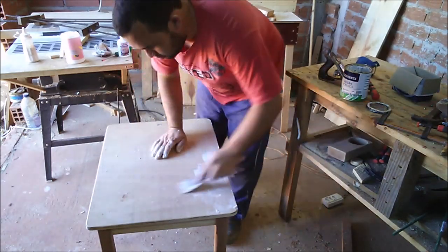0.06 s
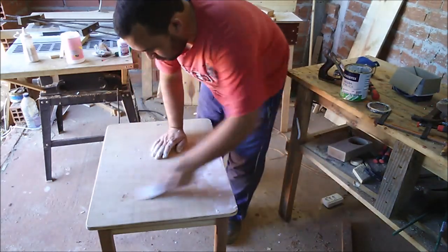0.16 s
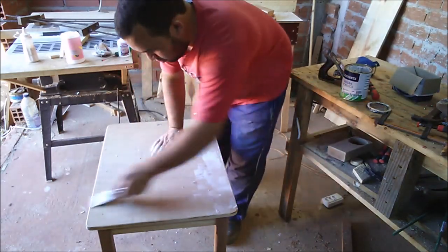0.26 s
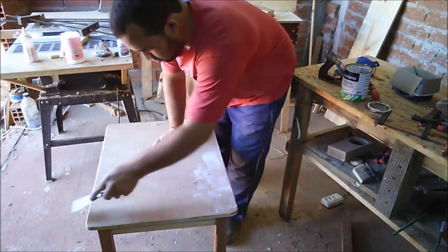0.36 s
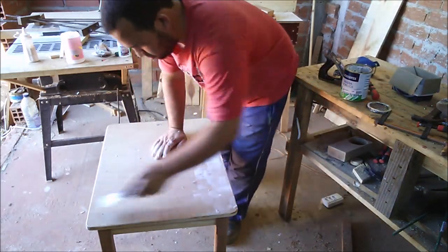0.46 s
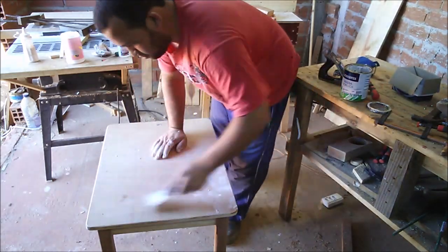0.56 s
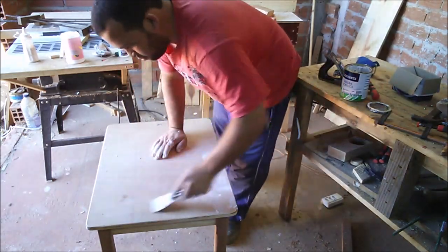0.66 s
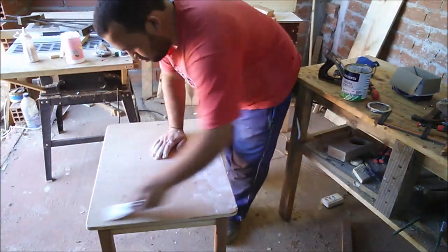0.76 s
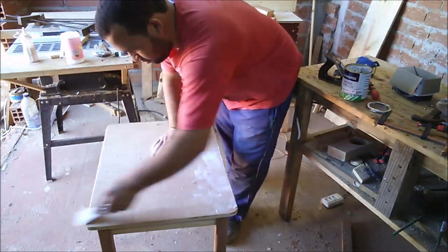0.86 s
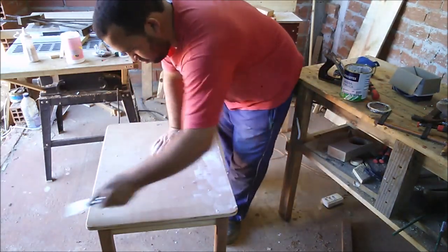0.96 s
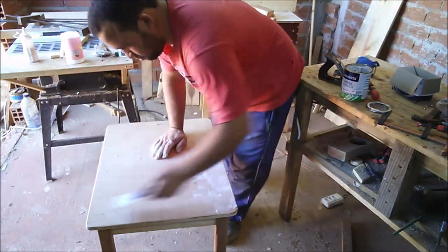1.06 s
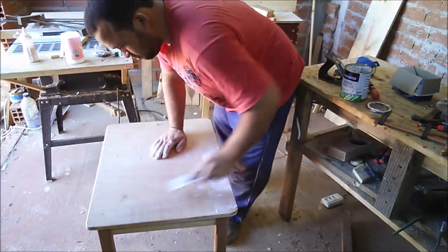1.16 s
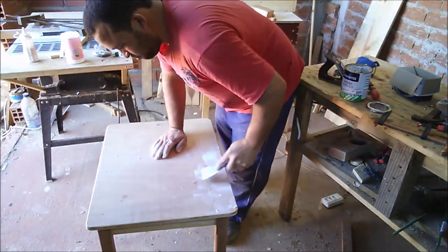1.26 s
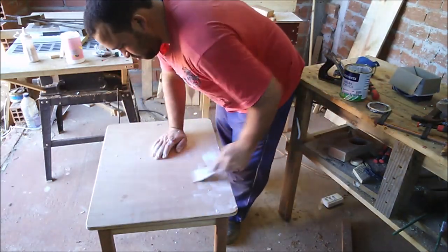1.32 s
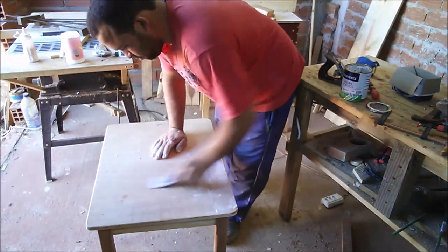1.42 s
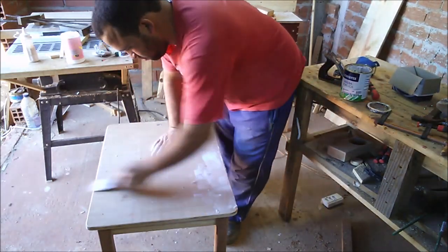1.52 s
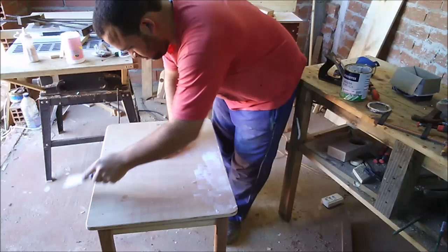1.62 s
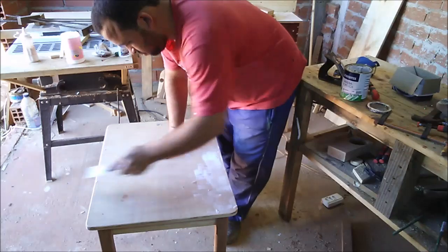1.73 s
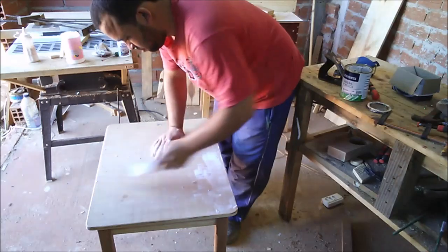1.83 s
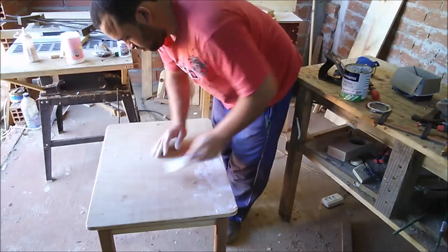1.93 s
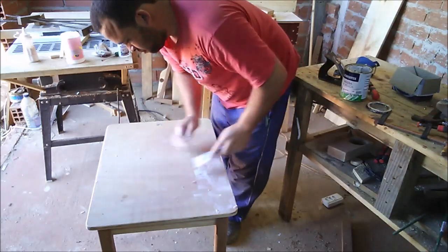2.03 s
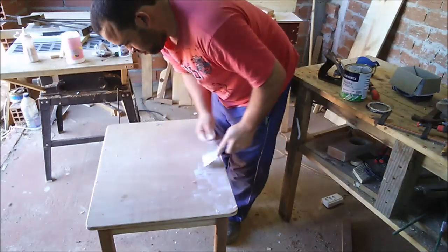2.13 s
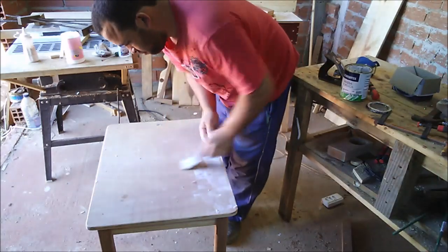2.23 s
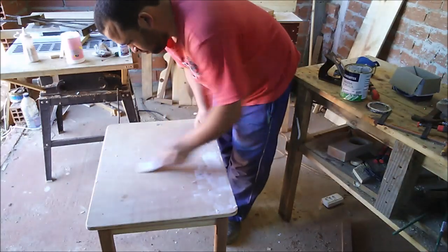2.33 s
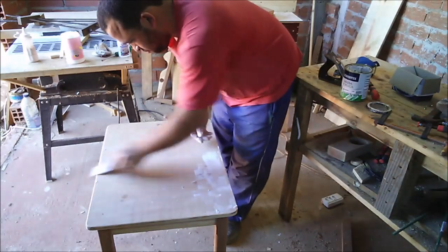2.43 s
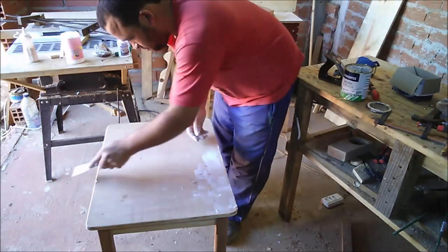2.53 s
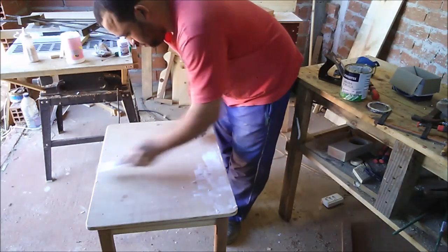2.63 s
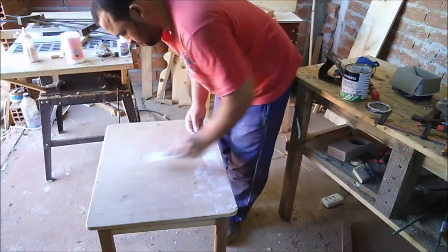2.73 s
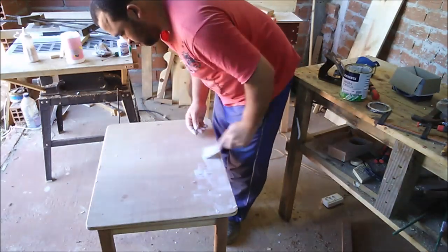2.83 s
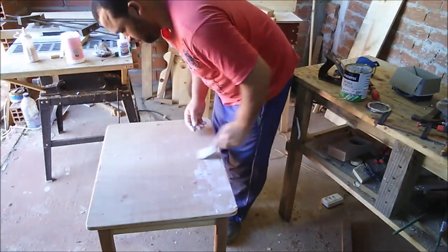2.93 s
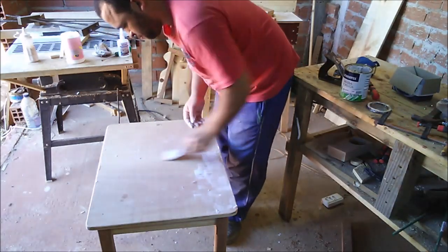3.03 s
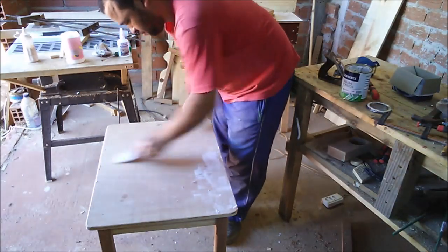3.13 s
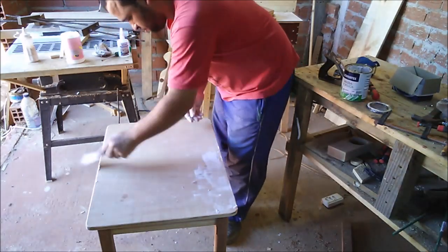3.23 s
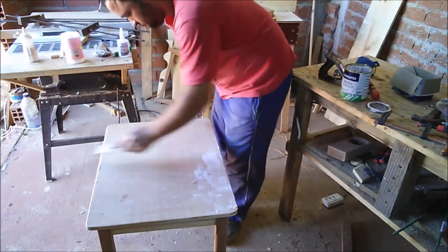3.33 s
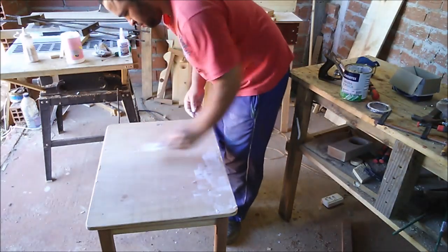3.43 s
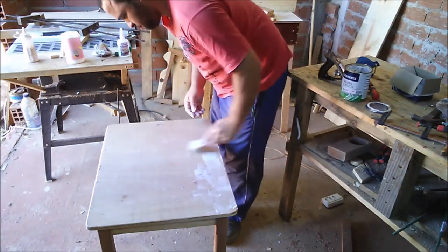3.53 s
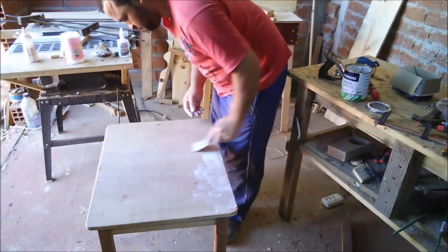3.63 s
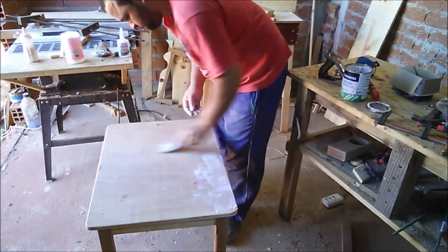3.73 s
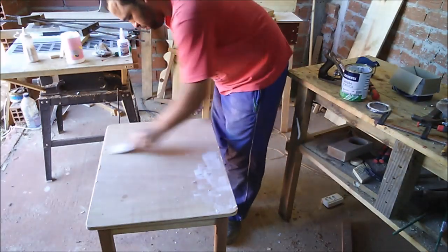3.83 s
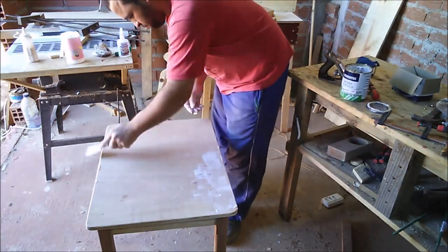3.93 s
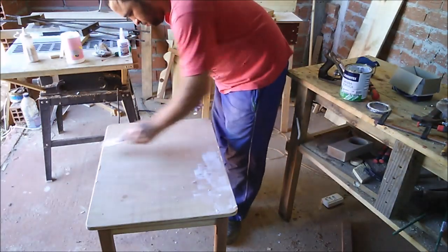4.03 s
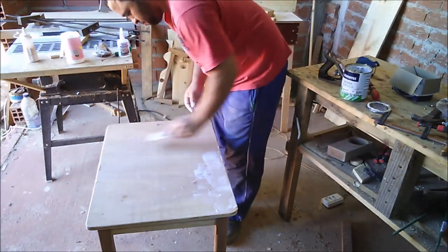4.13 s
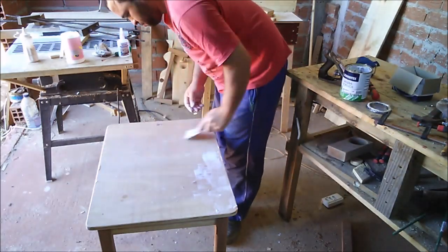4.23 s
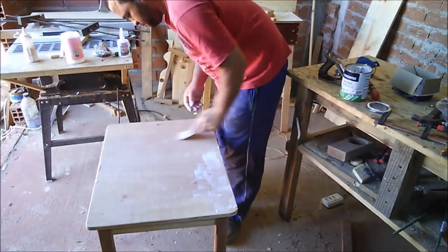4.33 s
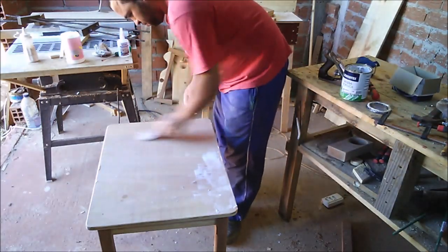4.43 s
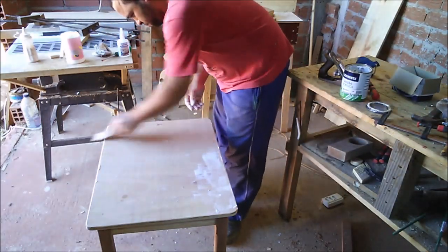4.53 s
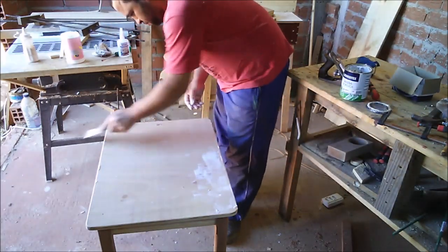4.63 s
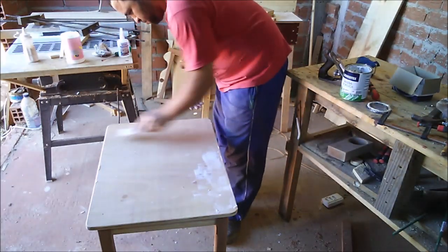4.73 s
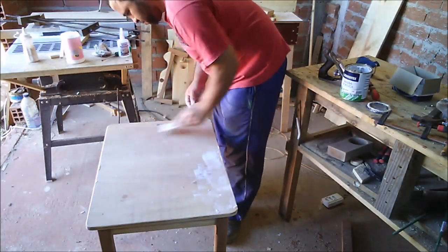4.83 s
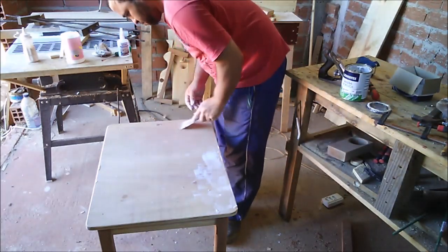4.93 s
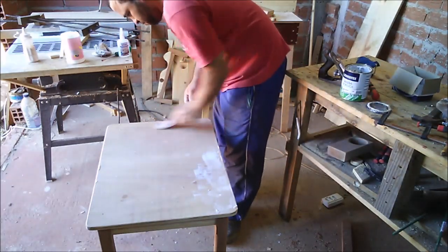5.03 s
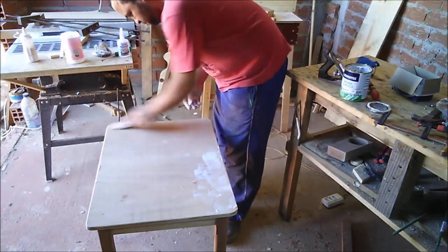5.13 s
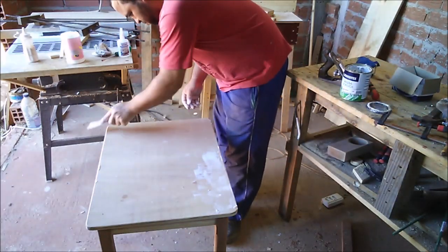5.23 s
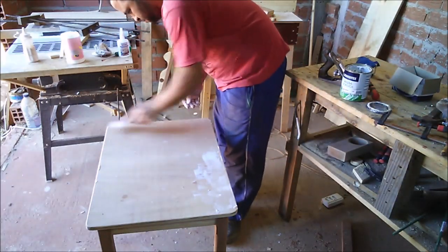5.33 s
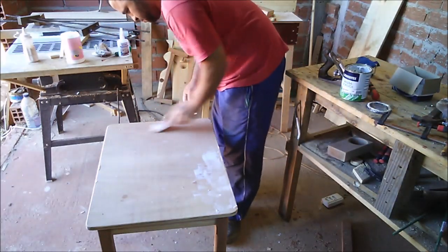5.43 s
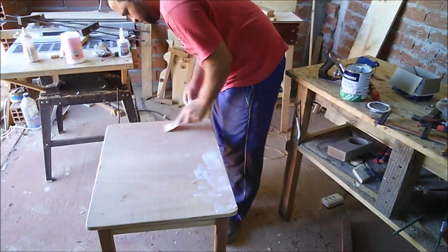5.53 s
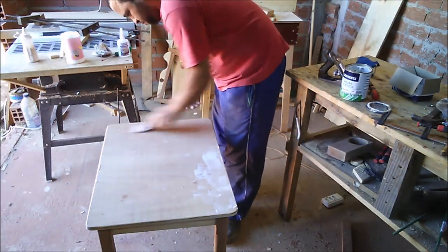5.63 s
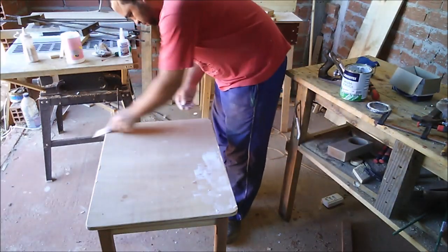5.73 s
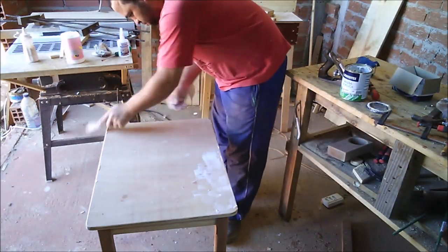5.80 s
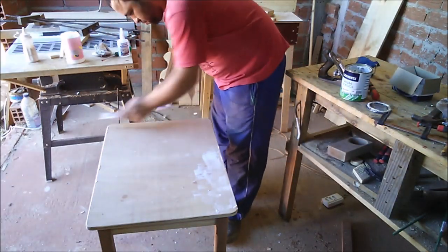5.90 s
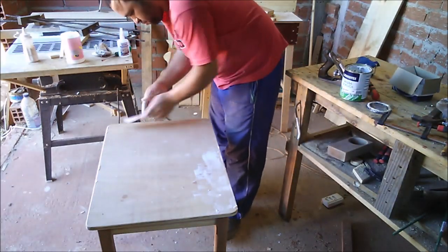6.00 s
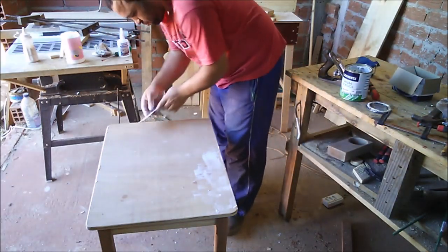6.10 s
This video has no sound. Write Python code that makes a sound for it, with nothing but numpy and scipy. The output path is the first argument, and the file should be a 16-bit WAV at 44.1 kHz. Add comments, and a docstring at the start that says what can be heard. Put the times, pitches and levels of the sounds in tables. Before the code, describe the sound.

Sandpaper rasps across a wooden tabletop in nine quick, dry strokes, with soft bumps between them and faint distant bird hoots in a small workshop.

```python
"""In a small brick workshop, a hand sweeps a pad of sandpaper over a wooden table in about nine quick strokes.
Each rasp is noise made of tiny uneven hits; it swells and brightens with the hand, over a blurred, rising zip.
Softer rubs, bumps, paper snaps and one light graze are shaped noise too; table resonances and room echoes ring on.
Faint hoots and chirps, like distant birds, are wavering tones over quiet air noise.
One microphone with a noise suppressor hears it all."""
import sys
import numpy as np
from scipy import signal
from scipy.fft import rfft, irfft, next_fast_len
from scipy.io import wavfile
from scipy.ndimage import uniform_filter1d, map_coordinates

SR = 44100
rng = np.random.default_rng(int(sys.argv[2]) if len(sys.argv) > 2 else 0)


def to_wav(s):
    """Save 16-bit WAV."""
    ch = np.atleast_2d(s).T  # columns
    pcm = np.round(np.clip(ch, -1, 1) * 32767)  # PCM
    wavfile.write(sys.argv[1], SR, pcm.astype(np.int16))


N = 271656  # length of the scene in samples

# Full sweeps of the pad. Rasp level holds at full force; board and fizz are relative to the rasp,
# at top speed (fizz also at full force). Swell leads up to full force, easing is the loss by the end,
# edge is the extra board sound as the pad runs off.
# start_s, length_s, settle_s, full_force_s, rasp_db, swell_db, easing_db, board_db, fizz_db, edge_db
STROKES = [(0, 0.38, 0.0017, 0.19, -29.5, 18.3, 5, -13, -14.5, -2),
           (.726, 0.19, 0.019, 0.081, -31.5, 10.8, 8, -17.5, -13.5, 20),
           (1.374, 0.23, 0.0079, 0.1, -30, 14.2, 2, -16, -12, 10.5),
           (2.218, 0.28, 0.015, 0.13, -29.5, 1.8, 1, -15, -14.5, 7),
           (2.972, 0.31, .016, .18, -28.5, 9, 1.5, -17, -14.5, 8.5),
           (3.685, 0.29, 0.056, 0.18, -29.5, 6.5, 4, -11, -13, 7.5),
           (4.369, .25, 0.037, .137, -29.5, 9.5, 3, -15.5, -14, 13.5),
           (5.022, .245, 0.042, .11, -29.5, 6.4, 5.5, -16.5, -15.5, 5.5),
           (5.608, 0.2, 0.011, 0.1, -29, 7.7, 2, -16.5, -15.5, 9.5)]
# The pad rests or shifts without a full sweep; board and fizz are relative to the rasp.
# start_s, length_s, rasp_db, board_db, fizz_db
BRUSHES = [(.691, 0.038, -58.5, 10, -28), (1.72, 0.2, -57.5, 5, -39), (1.918, 0.057, -44.5, -5, -29),
           (2.935, 0.062, -48.5, -5, -12.5), (3.669, .04, -70.5, 13.5, -36), (4.363, 0.022, -54.5, 5, -41),
           (5.527, 0.057, -35.5, 0.5, -15), (6.107, .06, -49, -21, -17)]
# The pad lands or bumps over the edge. Level is before the fade-in and fade-out;
# the thump is relative to the scuff.
# start_s, level_db, scuff_hz, thump_db
BUMPS = [(.896, -30, 996, -19), (1.381, -37.5, 580, -3.5), (1.587, -25.5, 1630, -29),
         (1.851, -41.5, 374, -6.5), (2.226, -29, 1035, -0.5), (2.478, -26, 2430, -32),
         (2.492, -32, 683, -29), (2.988, -28.5, 1060, -3.5), (3.03, -26.5, 1010, -17.5),
         (3.275, -33, 618, -14), (3.727, -28.5, 1030, -15.5), (3.886, -28, 1004, -15),
         (3.965, -35, 602, -9.5), (4.563, -24, 1420, -36), (4.608, -31.5, 1434, -28),
         (5.045, -29, 806, -27), (5.538, -43, 1100, 0), (5.572, -27, 610, -11.5), (5.793, -24, 1520, -39),
         (5.803, -25, 752, -9)]
# The paper catches and snaps; level is before the sound is coloured.
# start_s, level_db, pitch_hz
SNAPS = [(3.8864, -9, 2930), (3.895, -17.5, 4360), (5.796, -21, 2640)]
# Far hoots, all on one note: start_s, length_s, level_db
HOOTS = [(-.06, 0.13, -55), (1.03, 0.14, -54.5), (1.966, 0.084, -54), (2.891, 0.13, -48.5),
         (4.002, .16, -54.5), (4.87, 0.143, -53.5), (5.96, .16, -60.5)]
# Gliding calls of other far birds: start_s, length_s, start_hz, end_hz, level_db
CHIRPS = [(1.229, 0.18, 4750, 4740, -66.5), (2.136, 0.17, 4210, 4430, -67), (2.81, 0.22, 6180, 6200, -77.5),
          (3.45, 0.13, 859, 755, -61), (3.451, .096, 4270, 3930, -64.5), (4.21, .21, 884, 815, -56.5)]

# Tone colours of the rasp, board, fizz and outdoor air, before each is levelled: pitch_hz, level_db (per Hz)
RASP_COLOUR = [(100, -65.5), (500, -42.5), (900, -29.5), (1050, -16), (1500, -4), (2000, -6), (2500, 0),
               (3200, 0.5), (4600, 1), (6100, -2.5), (6900, -10), (8000, -17), (11000, -43.5),
               (15000, -54.5)]
BOARD_COLOUR = [(40, -66), (100, -41), (180, -34), (240, -10.5), (450, -3.5), (700, 3), (1100, 3),
                (1600, -3.5), (2400, 4), (5000, -34), (12000, -67)]
FIZZ_COLOUR = [(1000, -71.5), (5000, -36.5), (7000, 6), (8000, 2.5), (10000, -2), (12000, -10.5),
               (15500, -13)]
AIR_COLOUR = [(25, -31), (60, -17.5), (150, -17.5), (240, -.5), (500, 9.5), (800, -1), (1300, -14.5),
              (2500, -20), (4200, -12), (6000, -17.5), (9000, -26), (15000, -31)]
# Tone colour of the grazing paper edge, before levelling: pitch_hz, level_db
GRAZE_COLOUR = [(900, -44), (1500, 13.5), (2400, -55), (3500, 11.0), (4300, 1),
                (5200, 15.0), (6500, 3.5), (8500, -0.5), (10000, -42)]
# Clear resonances of the table top, before the board colour: pitch_hz, width_hz, level_db
TABLE_MODES = [(234, 14, -20), (485, 25, -5), (603.7, 28, 6.5), (837, 29, -1), (1016, 31, 1.5),
               (1121, 90, 1.5), (1471, 130, 7), (1684, 100, 6)]
# Time the room takes to fade by 60 dB: pitch_hz, fade_s
ROOM_FADE = [(200, 0.23), (530, 0.51), (1400, 0.47), (3700, 0.4), (9700, 0.29), (15000, 0.29)]
# Below this the noise suppressor turns sound down: pitch_hz, threshold_db (per Hz)
HUSH_THRESHOLD = [(500, -112), (1500, -99), (4000, -105.5), (8000, -106), (15000, -116)]

TOP_SPEED_AT = .72  # share of a sweep after which the hand is fastest
SLOW_BOARD_DB, SLOW_FIZZ_DB = 16.5, -8  # a slow pad shakes the board more and fizzes less
FIZZ_GROWTH = 0.14  # extra dB of fizz for each dB of force
EDGE_S = 0.034  # the board sound changes over this time as the pad reaches the edge
LIFT_S = .012  # fade as the pad leaves the wood
BRIGHT_HZ, SLOW_BRIGHT_DB, FAST_BRIGHT_DB = 4200, -2, 2  # the rasp above this pitch follows the speed
ZIP_HZ, ZIP_BLUR_HZ = 5001, 697  # grains crossing fibres at top speed, and how far that rate scatters
ZIP_DB = -6  # the zip at its clearest, relative to the rasp
RIPPLE_DB, RIPPLE_TREBLE_DB = 2, 1.06  # how much the colour differs from place to place, low and high
BRUSH_ATTACK_S = 0.013
GRAZE_S = 1.148  # when the paper's edge touches on the way back
DOVE_HZ, DOVE_SAG_HZ = 548, 7.2  # note of the dove-like hoot, and how far it sags
HUSH_DEPTH_DB = -6  # the most the suppressor turns sound down
TOP_HZ = 15800  # nothing above this is kept


def amp(db):
    """Turn decibels into a plain multiplier."""
    return 10 ** (np.asarray(db) / 20)


def unit(x):
    """Scale a sound to an average (rms) level of 1."""
    return x / np.sqrt(np.mean(x ** 2) + 1e-20)


def along(points, hz):
    """Read a value between (Hz, value) points, spacing pitch by ratio as the ear does."""
    point_hz, value = np.transpose(points)
    return np.interp(np.log(hz + 1), np.log(point_hz + 1), value)


def wobble(n, rate):
    """Draw a smooth random curve of n samples with rate turning points' worth of noise a second."""
    return map_coordinates(rng.standard_normal(4096), [np.arange(n) * rate / SR], mode="wrap")


def ease(u):
    """A smooth step from 0 to 1 as u goes from 0 to 1."""
    return np.sin(np.pi / 2 * np.clip(u, 0, 1)) ** 2


def filtered(x, response):
    """Reshape a sound by giving each pitch its own gain."""
    m = next_fast_len(len(x) + 8192)  # spare room lets the ringing die away
    hz = np.fft.rfftfreq(m, 1 / SR)
    return irfft(rfft(x, m) * response(hz), m)[:len(x)]


def resonance(f, hz, width):
    """One ringing note that starts when struck, with a peak gain of 1."""
    return 1j * f * width / (hz * hz - f * f + 1j * f * width)


def add(track, s, x):
    """Mix a sound into the track from time s, cutting what falls outside."""
    start = round(s * SR)
    x = x[max(-start, 0):max(N - start, 0)]
    track[max(start, 0):][:len(x)] += x


def workshop(x, direct_db=-3, early_db=-3, early_t60=0.029):
    """Add near reflections and a fading room tail; each call draws new echoes, as for a new place."""
    hz, t, bands = signal.stft(rng.standard_normal(SR * 3 // 4), SR, nperseg=256)
    fade = amp(-60 * t / along(ROOM_FADE, hz)[:, None])
    tail = signal.istft(bands * fade, SR, nperseg=256)[1]
    t = np.arange(len(tail)) / SR
    # cubing the noise leaves a few strong reflections among many weak ones
    early = rng.standard_normal(len(t)) ** 3 * amp(-60 * t / early_t60)
    echo = tail / np.linalg.norm(tail) + amp(early_db) * early / np.linalg.norm(early)
    echo[0] += amp(direct_db)
    return signal.fftconvolve(x, echo / np.linalg.norm(echo))


def call(length, start_hz, end_hz, db, waver_hz=7):
    """A far, thin call that swells and fades; the higher it is, the faster it flutters."""
    n = int(length * SR)
    hz = np.linspace(start_hz, end_hz, n) + waver_hz * wobble(n, 100)
    flutter_rate = start_hz / 35
    flutter = 1 + .6 * (wobble(n, flutter_rate) + 1j * wobble(n, flutter_rate))
    tone = unit(np.real(flutter * np.exp(2j * np.pi * np.cumsum(hz) / SR)))
    return amp(db) * signal.windows.tukey(n, .8) * tone


def background(level_db=-65.5):
    """Quiet outdoor air as soft noise; far hoots and chirps come in and echo round the workshop."""
    air = unit(filtered(rng.standard_normal(N), lambda f: amp(along(AIR_COLOUR, f))))
    air = air * amp(level_db + 0.62 * wobble(N, 36))
    hoots = [(s, length, DOVE_HZ, DOVE_HZ - DOVE_SAG_HZ, db) for s, length, db in HOOTS]
    for s, *shape in [*hoots, *CHIRPS]:
        add(air, s, workshop(call(*shape), direct_db=-1))
    return air


def wood(f, plain_db=-3):
    """The table's answer: a few clear ringing notes over many that blur together."""
    modes = sum(amp(db) * resonance(f, hz, width) for hz, width, db in TABLE_MODES)
    return amp(along(BOARD_COLOUR, f)) * (amp(plain_db) + modes)


def grit(n, spread_db=4):
    """Countless tiny hits of grains on wood fibres, a few much harder than the rest."""
    return unit(rng.standard_normal(n) * amp(spread_db * rng.standard_normal(n)))


def scratch(n, response):
    """Grit coloured by a response, at an average level of about 1."""
    # the extra half second comes off again after levelling
    return unit(filtered(grit(SR // 2 + n), response))[:n]


def grain_zip(speed, clearest_at=.45, clear_span=0.48):
    """Grains pass the wood fibres at a rate that follows the speed: a blurred zip."""
    n = len(speed)
    turn = np.exp(2j * np.pi * np.cumsum(ZIP_HZ * speed) / SR)
    blur = wobble(n, ZIP_BLUR_HZ) + 1j * wobble(n, ZIP_BLUR_HZ)
    zipping = unit(np.real(turn * blur))
    # the zip stands out while the pad gathers speed and melts into the rasp after that
    clearness = np.exp(-((np.linspace(0, 1, n) - clearest_at) / clear_span) ** 2)
    return amp(ZIP_DB) * clearness * zipping


def rubbing(n, settle, board_db, fizz_db, bright_db, zipping=0, chatter_db=0.5, chatter_rate=170, drift_db=.5):
    """Paper on wood from touch to lift: grit rasps and fizzes, and the board answers."""
    t = np.arange(n) / SR
    rasp = scratch(n, lambda f: amp(along(RASP_COLOUR, f)))
    upper = filtered(rasp, lambda f: 1 - 1 / (1 + (f / BRIGHT_HZ) ** 8))
    lower = rasp - upper
    rasp = unit(lower + amp(bright_db) * upper + zipping)
    board = amp(board_db) * scratch(n, wood)
    fizz = amp(fizz_db) * scratch(n, lambda f: amp(along(FIZZ_COLOUR, f)))
    # the paper grips and slips unevenly
    chatter = unit(amp(chatter_db * wobble(n, chatter_rate) + drift_db * wobble(n, 24.8)))
    contact = ease(t / settle) * np.clip((t[-1] - t) / LIFT_S, 0, 1)
    return contact * chatter * (rasp + board + fizz)


def stroke(length, settle, rise, db, swell_db, easing_db, board_db, fizz_db, edge_db):
    """One sweep: the force swells and eases off, and the sound brightens as the hand gathers speed."""
    n = int((length + LIFT_S) * SR)
    t = np.arange(n) / SR
    speed = np.abs(np.sin(np.pi / 2 * np.linspace(.03, 1, n) / TOP_SPEED_AT)) ** .8
    late = np.clip((t - rise) / max(length - rise, LIFT_S), 0, 1)
    force_db = -swell_db * (1 - ease(t / rise)) - easing_db * late ** 2
    on_edge = ease(1 + (t - length) / EDGE_S)
    board = board_db + SLOW_BOARD_DB * (1 - speed) + edge_db * on_edge
    fizz = fizz_db + SLOW_FIZZ_DB * (1 - speed) + FIZZ_GROWTH * force_db
    bright = SLOW_BRIGHT_DB + (FAST_BRIGHT_DB - SLOW_BRIGHT_DB) * speed ** 2
    return amp(db + force_db) * rubbing(n, settle, board, fizz, bright, grain_zip(speed))


def ripple(f, spacing_hz=190):
    """Each place on the board favours other bending waves; in the treble they blur together."""
    bass_share = 1 / (1 + (f / 2600) ** 4)
    depth_db = RIPPLE_TREBLE_DB + (RIPPLE_DB - RIPPLE_TREBLE_DB) * bass_share
    return amp(depth_db * map_coordinates(rng.standard_normal(512), [f / spacing_hz], mode="wrap"))


def travelling(x, count=3):
    """The pad crosses the table, so the colour and echoes of one place give way to those of the next."""
    place = np.linspace(0, count - 1, len(x))
    shares = [np.sqrt(np.clip(1 - np.abs(place - k), 0, 1)) for k in range(count)]
    return sum(workshop(filtered(x * share, ripple)) for share in shares)


def brush(length, db, board_db, fizz_db, bright_db=-1):
    """A short, even rub, too slow to zip."""
    n = int((length + LIFT_S) * SR)
    return amp(db) * rubbing(n, BRUSH_ATTACK_S, board_db, fizz_db, bright_db)


def bump(db, hz, thump_db, t60=0.084, attack=0.0066, damping=0.18, thump_hz=270):
    """A soft blow of the pad: a short scuff and a low thump, both ringing through the table."""
    t = np.arange(SR // 4) / SR
    scuff = unit(filtered(grit(len(t)), lambda f: wood(f) * resonance(f, hz, damping * hz) ** 2))
    thump = unit(filtered(grit(len(t)), lambda f: wood(f) * resonance(f, thump_hz, 180) ** 2))
    envelope = amp(db - 60 * t / t60) * (1 - np.exp(-t / attack))
    return envelope * (scuff + amp(thump_db) * thump)


def graze(db=-47, t60=0.13, attack=0.0042):
    """The paper's edge just brushes the top on the way back: a brief, fading hiss of grit."""
    t = np.arange(SR // 4) / SR
    hiss = unit(filtered(grit(len(t)), lambda f: amp(along(GRAZE_COLOUR, f))))
    return amp(db - 60 * t / t60) * (1 - np.exp(-t / attack)) * hiss


def snap(db, hz, t60=0.0094, damping=0.49):
    """The stiff paper catches and lets go: a very short burst around one pitch."""
    t = np.arange(SR // 10) / SR
    # narrow bands pass less noise, so the division makes up for it
    burst = amp(db - 60 * t / t60) * rng.standard_normal(len(t)) / np.sqrt(damping * hz / SR)
    return filtered(burst, lambda f: amp(along(RASP_COLOUR, f)) * resonance(f, hz, damping * hz) ** 2)


def suppress(x, size=512):
    """The noise suppressor turns down each band of pitch while it is faint, which thins the tails."""
    hz, _, bands = signal.stft(x, SR, nperseg=size)
    density = np.abs(bands) ** 2 * size / (.75 * SR)  # power per Hz
    # smooth over neighbouring pitches, then over time
    density = uniform_filter1d(density, size=5, axis=0)
    density = np.abs(uniform_filter1d(density, size=3, axis=1))
    over = (density / amp(along(HUSH_THRESHOLD, hz))[:, None] ** 2) ** 2
    return signal.istft(bands * amp(HUSH_DEPTH_DB / (1 + over)), SR, nperseg=size)[1][:len(x)]


def scene():
    """Strokes, brushes, bumps, a graze and snaps over the background, the same in both channels."""
    mix = background()
    for s, *sweep in STROKES:
        add(mix, s, travelling(stroke(*sweep)))
    for s, *rub in BRUSHES:
        add(mix, s, workshop(filtered(brush(*rub), ripple)))
    for s, *blow in BUMPS:
        add(mix, s, workshop(bump(*blow)))
    add(mix, GRAZE_S, workshop(graze()))
    for s, *catch in SNAPS:
        add(mix, s, workshop(snap(*catch), direct_db=3.5))
    return np.array([mix, mix])


def record(dry):
    """One microphone hears a single channel, hushes faint noise and keeps nothing above its top pitch."""
    mono = filtered(suppress(dry.mean(axis=0)), lambda f: f < TOP_HZ)
    return np.array([mono, mono])


dry = scene()
out = record(dry)
to_wav(out)
```